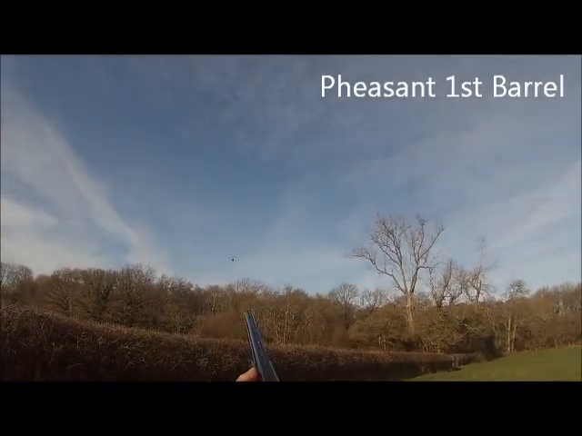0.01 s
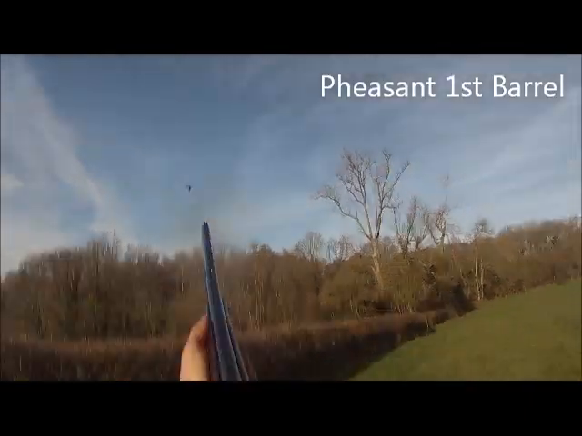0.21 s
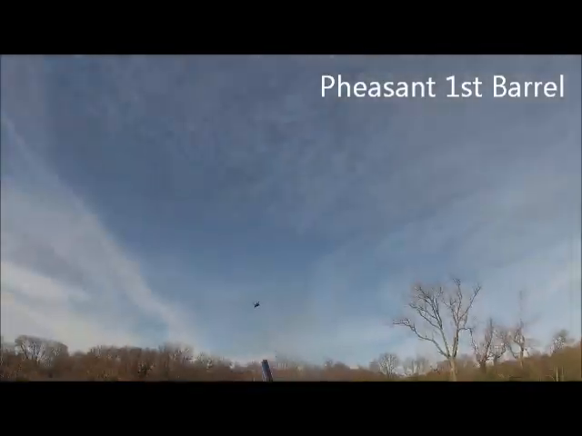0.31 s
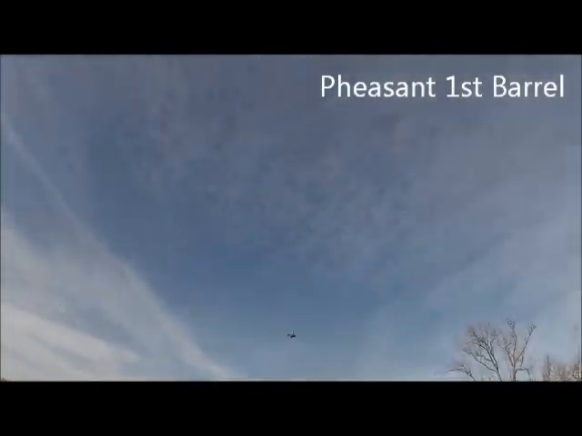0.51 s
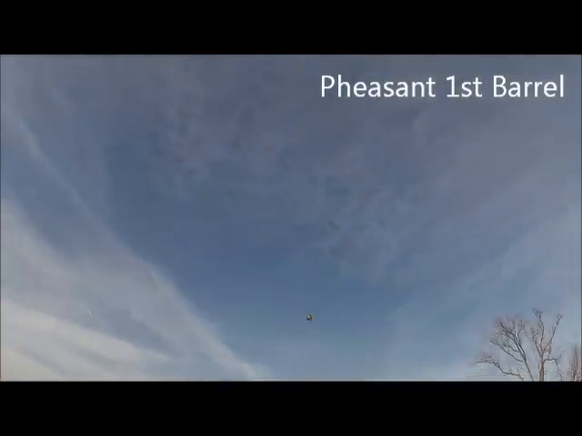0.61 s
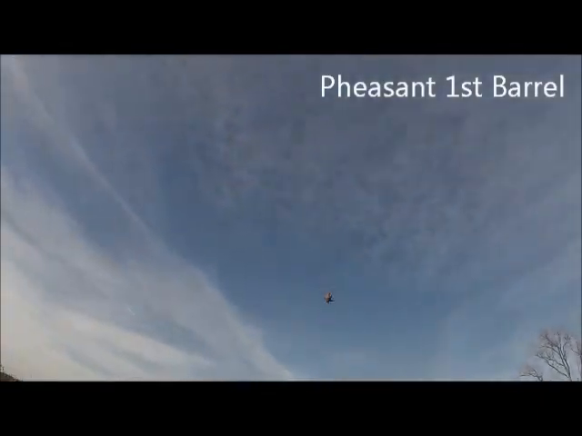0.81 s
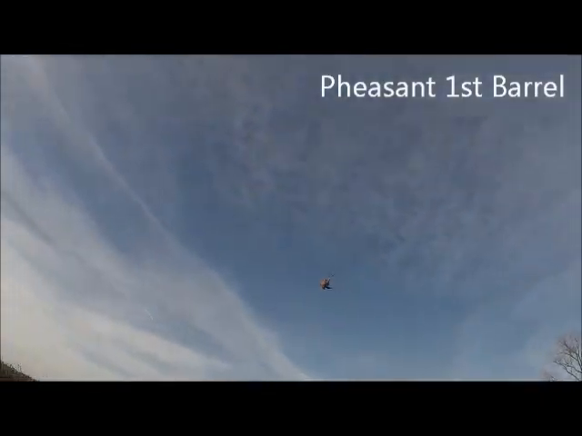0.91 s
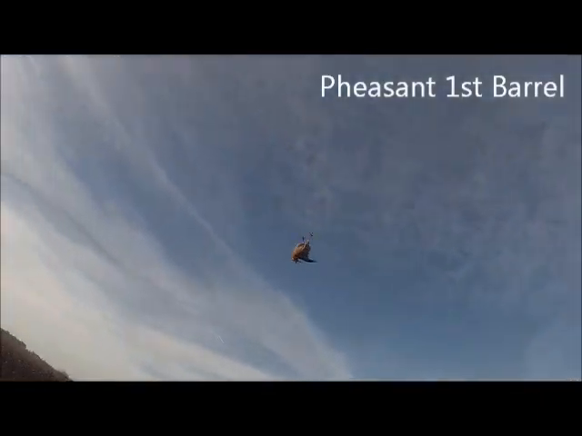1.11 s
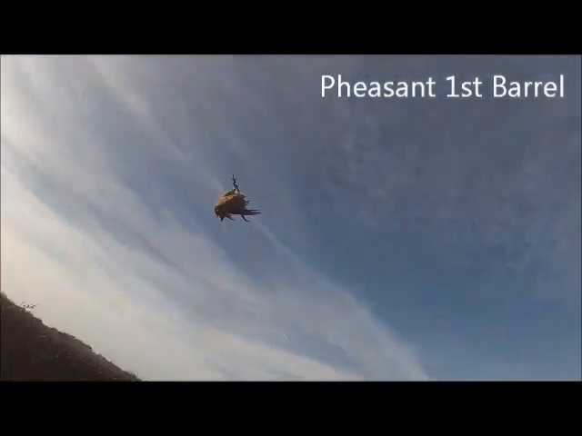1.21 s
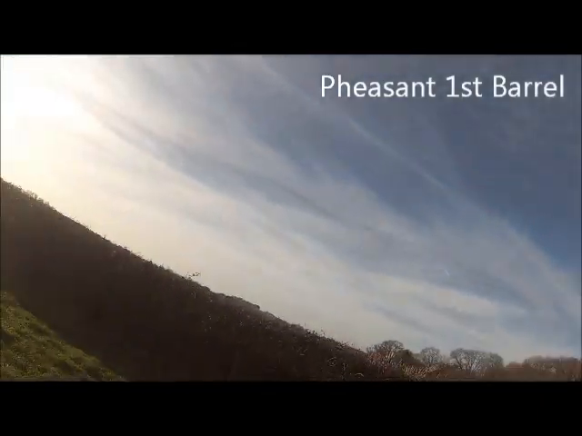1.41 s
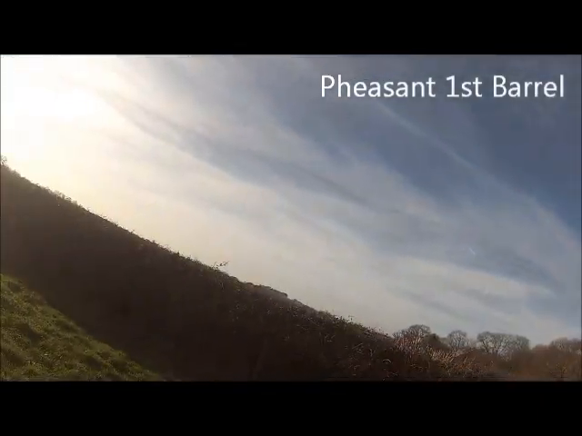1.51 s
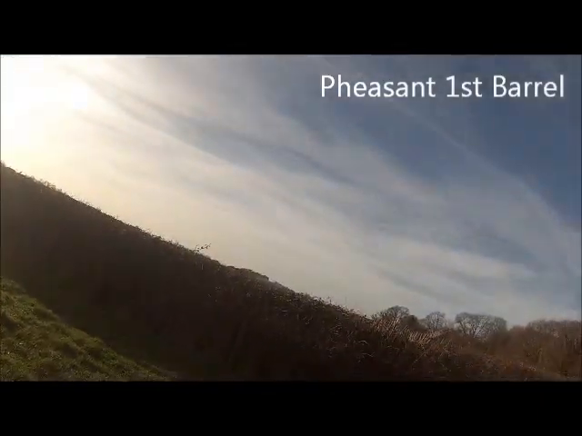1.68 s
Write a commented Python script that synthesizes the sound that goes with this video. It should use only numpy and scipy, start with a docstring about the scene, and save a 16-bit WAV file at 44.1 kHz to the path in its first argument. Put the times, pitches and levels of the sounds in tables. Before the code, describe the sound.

One very loud shotgun shot beside the microphone, with short rolling echoes, recoil thumps and a metallic click.

```python
"""A shotgun is fired right beside a small head-worn camera in open country: sharp fronts and gas noise ring its housing.
Filtered noise comes back as echoes, first from hedges, then a tree line, then far woods; damped sines are the jolts
of recoil. Noise bursts through one set of resonances make the clicks of the gun's action and two faint slaps of
returning echo. Cloth rustles as grainy noise, and the camera's electronics tick about ten times a second over wind
rumble and hiss. The blast overloads the camera, whose gain drops and creeps back."""
import sys
import numpy as np
from scipy import signal
from scipy.fft import rfft, irfft
from scipy.io import wavfile
from scipy.ndimage import uniform_filter1d

SR = 44100
rng = np.random.default_rng(int(sys.argv[2]) if len(sys.argv) > 2 else 0)


def transcribe(u):
    """Save the signal u as a 16-bit wav file named by the first command-line argument.

    u: samples, shape (n,) or (channels, n), limited to [-1, 1]; the rate is SR.
    q: integer samples, one column per channel.
    """
    v = np.clip(np.atleast_2d(u).T, -1, 1)
    q = np.round(v * 32767).astype(np.int16)
    wavfile.write(sys.argv[1], SR, q)


def amplitude_ratio(level_db):
    """Convert a level in decibels to the matching linear amplitude (field) ratio."""
    exponent = np.asarray(level_db, float) / 20
    return 10 ** exponent


N = 77175
T = np.arange(N) / SR  # time in s

# Blast arrivals at the microphone, in order muzzle, barrel, ground, body:
# start_s, level_db, favoured_hz, narrowing_db_per_octave_squared
BLASTS = [(0.2193, -2.5, 6400, 4), (0.2209, -3.5, 5017, 1.5), (0.2221, -0.5, 1800, 3.5),
          (0.2253, -14, 5983, 2)]


def curve(rows):
    """Gain over time, drawn straight in dB between (s, dB) points."""
    return amplitude_ratio(np.interp(T, *np.array(rows).T))


def colour(points):
    """Noise of rms 1 whose spectrum follows (Hz, dB) points on a log frequency axis."""
    point_hz, point_db = np.array(points).T
    hz = np.arange(N // 2 + 1) * SR / N + 1  # the 1 keeps the logarithm finite
    gain = amplitude_ratio(np.interp(np.log(hz), np.log(point_hz), point_db))
    noise = irfft(rfft(rng.standard_normal(N)) * gain, N)
    return noise / np.std(noise)


def walk(rate_hz):
    """Slow random wander of mean 0 and spread 1: smoothed steps, rate_hz of them a second."""
    step = int(SR / rate_hz)
    held = np.repeat(rng.standard_normal(N // step + 1), step)[:N]
    wander = uniform_filter1d(held, step)
    return (wander - wander.mean()) / wander.std()


def ring(drive, modes, favoured_hz, narrow_db):
    """Decaying modes (Hz, dB, t60 s) rung by a drive, alternating in sign, weighted around favoured_hz."""
    t = T[:SR // 5]
    response = np.zeros(len(t))
    for k, (hz, db, t60) in enumerate(modes):
        weighted_db = db - narrow_db * np.log2(hz / favoured_hz) ** 2
        decay = amplitude_ratio(weighted_db - 60 * t / t60)
        response += (-1) ** k * decay * np.sin(2 * np.pi * hz * t)
    return signal.fftconvolve(drive, response)[:len(drive)]


def soft(x, hz, kind="low", order=1):
    """Butterworth filter, gentle unless the order is raised."""
    return signal.lfilter(*signal.butter(order, hz, kind, fs=SR), x)


def shot():
    """Each pressure front and the gas behind it ring the housing; the first also pushes the diaphragm."""
    # Resonances of the camera housing: mode_hz, level_db, t60_s
    housing = [(480, -3.5, .006), (1013, -3, 0.014), (1424, -4, .012), (1869, 0.5, .02), (2760, -11, 0.018),
               (3210, -8, 0.016), (4224, -0.5, .014), (4862, -5.5, 0.013), (5776, -1.5, .017),
               (6466, -1, .017), (7910, -10.5, .012), (9640, -10, 0.0081), (10284, -10.5, 0.0099),
               (13626, -10, .012)]
    gas_db, gas_t60_s = -16, 0.011  # turbulent gas, relative to its front
    push_db, push_s = -7, 0.0043
    rebound_db, rebound_s = -10, 0.02
    out = np.zeros(N)
    for start, db, hz, narrow_db in BLASTS:
        front = np.maximum(1 - abs(T - start) * SR, 0)  # about one sample wide
        gas_decay = amplitude_ratio(gas_db - 60 * np.maximum(T - start, 0) / gas_t60_s)
        gas = (T > start) * gas_decay * rng.standard_normal(N)
        out -= ring(amplitude_ratio(db) * (front + gas), housing, hz, narrow_db)
    age = np.maximum(T - BLASTS[0][0], 0)
    push = amplitude_ratio(push_db) * np.sin(np.pi * np.minimum(age / push_s, 1))
    after = np.maximum(age - push_s, 0) / rebound_s
    rebound = amplitude_ratio(rebound_db) * (1 - np.exp(-12 * after)) * np.exp(-after)
    return out - push + rebound


def echoes():
    """Scattered returns as patchy noise, crossfading in power from near to far and duller with distance."""
    # Level of this wash of echoes: time_s, level_db
    echo_level = [(.226, -5), (.241, -28), (.271, -22), (.355, -35), (.41, -46), (.453, -53), (.478, -52),
                  (.495, -55), (.517, -45.5), (.545, -55.5), (.572, -58.5), (.59, -44.5), (.62, -46),
                  (.69, -46.5), (.74, -49.5), (.9, -50.5), (1.15, -60), (1.4, -63), (1.75, -69.5)]
    # Spectra of hedges, tree line and far woods: frequency_hz, density_db_per_hz
    hedges = [(210, -39.5), (350, -9), (423, -18.5), (581, -13.5), (1010, -12.5), (1790, 1), (2420, -8),
              (2800, -3), (3720, -12), (4360, -1), (5440, -11), (6580, -5), (8480, -22.5), (10100, -20.5),
              (11500, -25.5), (14300, -25.5), (15500, -36.5)]
    tree_line = [(180, -34.5), (300, -5), (324, -3), (390, -16.5), (455, -4), (970, -3.5), (1130, -4),
                 (1200, -11.5), (1590, -1.5), (2270, -1.5), (2990, -7), (3280, -18), (4400, -5),
                 (5380, -16), (5720, -12), (6680, -18), (12000, -42), (15600, -71.5), (22000, -120)]
    woods = [(180, -40), (300, -10), (390, -7), (428, -15), (455, -3.5), (565, -2), (629, -6.5), (970, 0),
             (1260, -14), (1490, -3), (2070, -3.5), (3380, -16), (4470, -15), (5300, -25.5), (12000, -37.5),
             (15600, -67), (22000, -120)]
    mid_from_s, far_from_s, blend_s = 0.35, 0.84, 0.04
    patch_db = 2  # spread of the unevenness
    mid = 1 / (1 + np.exp((mid_from_s - T) / blend_s))
    far = 1 / (1 + np.exp((far_from_s - T) / blend_s))
    shares = [(1 - mid, hedges), (mid * (1 - far), tree_line), (mid * far, woods)]
    wash = np.zeros(N)
    for share, spectrum in shares:
        wash += np.sqrt(share) * amplitude_ratio(patch_db * walk(70)) * colour(spectrum)
    return (T > BLASTS[2][0]) * curve(echo_level) * wash  # silent until the ground arrival


def jolts():
    """Recoil jolts of the housing: low damped sines, each with a softened onset."""
    # Jolts: start_s, level_db, pitch_hz, t60_s
    thumps = [(0.245, -7, 41, 0.064), (.273, -30, 240, 0.11), (.287, -10.5, 54.4, 0.098),
              (.31, -23, 192, 0.069), (.318, -30.5, 260, 0.057), (.329, 0, 36.3, 0.13),
              (.362, -8.5, 38.7, 0.069), (.398, -39, 226, 0.2), (.682, -39.5, 330, 0.036),
              (.805, -36.5, 55.5, .08), (1.18, -31.5, 50, 0.072)]
    out = np.zeros(N)
    for start, db, hz, t60 in thumps:
        age = np.maximum(T - start, 0)
        onset = 1 - np.exp(-age * hz * 12)
        out -= amplitude_ratio(db - 60 * age / t60) * np.sin(2 * np.pi * hz * age) * onset
    return out


def clicks_and_slaps():
    """Clicks of the gun's action and two faint echo slaps: noise bursts with a faint tail, through one set of modes."""
    # Clicks of the action, and slaps of returning echo at 0.512 and 0.67 s:
    # start_s, level_db (rms of the first 5 ms), burst_s, favoured_hz, narrowing_db_per_octave_squared
    hits = [(.339, -30, 0.0012, 6960, 4), (.512, -48.5, 0.0056, 4500, 1.5), (.67, -54.5, .003, 8000, 1),
            (.923, -60, .002, 10000, -1), (1.038, -61, .002, 8000, 1), (1.0945, -50.5, .003, 9000, 1),
            (1.107, -59, .002, 6000, 10), (1.141, -53.5, 0.0034, 6500, 3),
            (1.1655, -28.5, 0.0026, 5600, 1.7), (1.1685, -28.5, 0.0037, 3200, 0.3),
            (1.2922, -57, 0.0047, 2995, 1.5)]
    # Resonances that clicks and slaps share: mode_hz, level_db, t60_s
    resonances = [(1466, -9.5, .025), (1800, -14, 0.025), (2200, -12, 0.0081), (2703, -2, 0.03),
                  (2872, -2, 0.029), (3710, -5, 0.0092), (4840, -9.5, 0.0072), (5730, -5, 0.0091),
                  (6400, -5, 0.01), (7350, -5.5, 0.0071), (9180, -6, 0.0084), (10440, -5.5, 0.0062),
                  (12140, -12, 0.005), (14370, -9, 0.0068)]
    tail_db, tail_t60_s = -24, 0.12  # diffuse tail, relative to the burst
    out = np.zeros(N)
    t = T[:SR // 8]
    for start, db, burst_s, hz, narrow_db in hits:
        burst = np.exp(-(t / burst_s) ** 2)
        tail = amplitude_ratio(tail_db - 60 * t / tail_t60_s)
        drive = (burst + tail) * rng.standard_normal(len(t))
        hit = soft(ring(drive, resonances, hz, narrow_db), 1200, "high", order=3)
        opening_rms = np.sqrt(np.mean(hit[:SR // 200] ** 2))
        i = int(start * SR)
        out[i:i + len(t)] += amplitude_ratio(db) * hit / opening_rms
    return out


def rustles():
    """Cloth rubbing: noise in half-sine swells, made grainy by a fast wander in level."""
    # Rustles: start_s, length_s, level_db
    rubs = [(1.61, 0.033, -53.5), (1.641, 0.017, -60.5), (1.657, .05, -66)]
    # Spectrum of the cloth: frequency_hz, density_db_per_hz
    cloth = [(400, -20.5), (900, -3), (1750, 0), (2350, -9), (3000, 1.5), (3600, -9.5), (4300, -5),
             (7000, -10.5), (12000, -19.5), (16000, -32)]
    grain_db = 4.7
    swell = np.zeros(N)
    for start, length, db in rubs:
        swell += amplitude_ratio(db) * np.sin(np.pi * np.clip((T - start) / length, 0, 1))
    return swell * amplitude_ratio(grain_db * walk(700)) * colour(cloth)


def ticks():
    """A short supply dip in the electronics, repeated; coupling drains it, so it overshoots as it ends."""
    first_s, every_s, length_s = 0.0037, 0.10239, 0.00185
    dip_db, drain_hz, edge_hz = -41, 90, 2500
    dip = -amplitude_ratio(dip_db) * ((T - first_s) % every_s < length_s)
    return soft(soft(dip, drain_hz, "high"), edge_hz, order=2)


def wind():
    """Wind rumble at the microphone: low noise that swells and sinks."""
    # Level of the rumble: time_s, level_db
    wind_level = [(0, -48), (.06, -38.5), (.09, -50.5), (.14, -39), (.2, -47.5), (.4, -30.5), (.453, -41),
                  (.49, -25), (.545, -40.5), (.61, -38.5), (.72, -49), (.9, -36), (.97, -44), (1.02, -40),
                  (1.15, -48.5), (1.345, -48), (1.53, -55.5), (1.6, -44), (1.75, -54)]
    # Spectrum of the rumble: frequency_hz, density_db_per_hz
    rumble = [(8.8, -33), (15, 4), (38, 4), (51, -3.5), (70, -23), (102, -20.5), (140, -27), (300, -28),
              (390, -53.5), (660, -120)]
    return curve(wind_level) * colour(rumble)


def hiss():
    """Background hiss: coloured noise with a slightly unsteady level."""
    # Spectrum of the hiss: frequency_hz, density_db_per_hz
    hiss_colour = [(59, -25), (100, -0.5), (174, -14.5), (621, -14.5), (818, -28), (891, -19), (2040, -22),
                   (2860, -23.5), (12700, -34.5), (15000, -32.5), (16000, -60.5)]
    level_db, unsteady_db = -61.5, 1.2
    return amplitude_ratio(level_db + unsteady_db * walk(27)) * colour(hiss_colour)


def scene():
    """All sources summed at the one microphone, as a single channel."""
    return (shot() + echoes() + jolts() + clicks_and_slaps() + rustles() + ticks() + wind() + hiss())[None]


def band_limit(x):
    """A steep low-pass at the top of the band."""
    return signal.sosfilt(signal.butter(12, 16280, fs=SR, output="sos"), x)


def record(dry):
    """Gain drops just after an overload and recovers steadily; the input stage saturates and rolls off."""
    coupling_hz, top_hz, edge_hz = 10, 13000, 15000
    duck_above_db, react_s, recover_db_per_s = -17.5, 0.0046, 19
    knee = 0.98  # amplitude that saturation approaches
    x = soft(dry[0], coupling_hz, "high")
    peak_db = 20 * np.log10(np.clip(abs(x), 1e-6, 1))
    # hold the loudest peak so far, falling at the recovery rate
    recovery_db = recover_db_per_s * T
    held_db = np.maximum.accumulate(peak_db + recovery_db) - recovery_db
    cut_db = np.maximum(held_db - duck_above_db, 0)
    late_cut_db = np.interp(T - react_s, T, cut_db)
    x = x * amplitude_ratio(-uniform_filter1d(late_cut_db, size=40))
    saturated = x / (1 + abs(x / knee) ** 3) ** (1 / 3)
    rolled_off = soft(saturated, top_hz)
    mix = soft(np.clip(rolled_off, -1, 1), edge_hz, order=6)
    return band_limit(mix[None])


dry = scene()
out = record(dry)
transcribe(out)
```